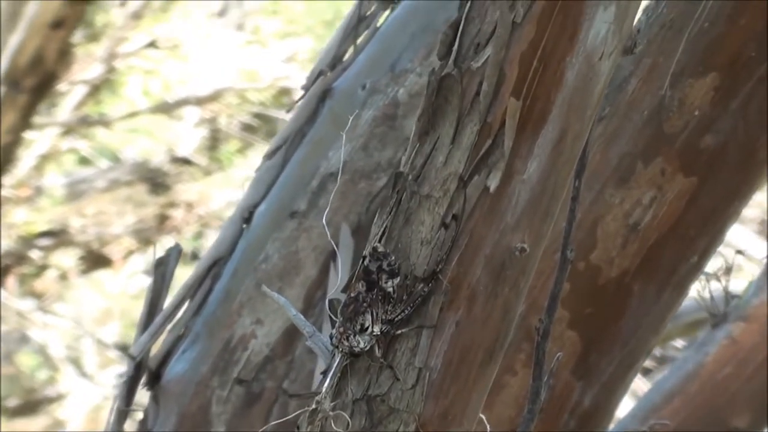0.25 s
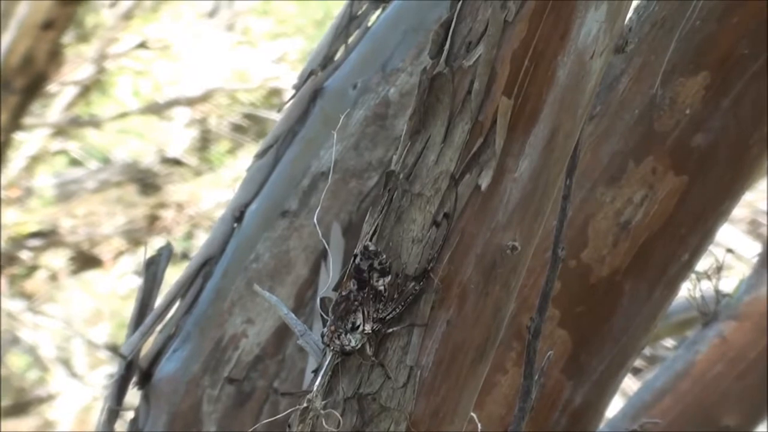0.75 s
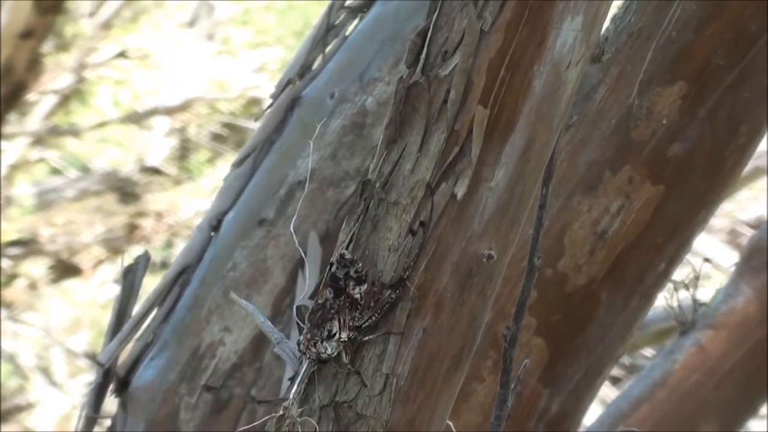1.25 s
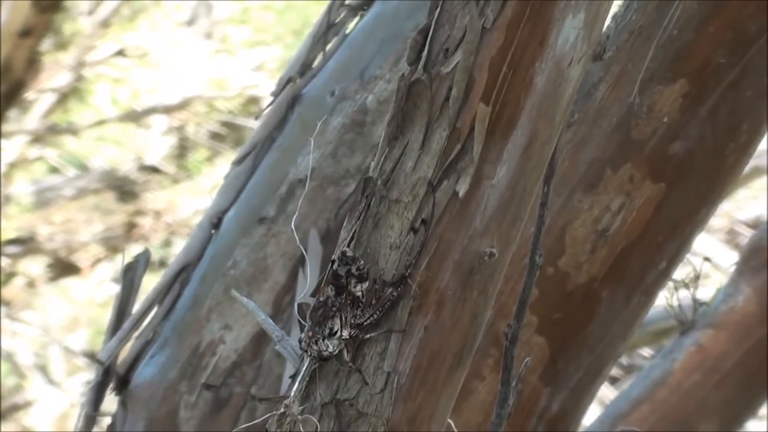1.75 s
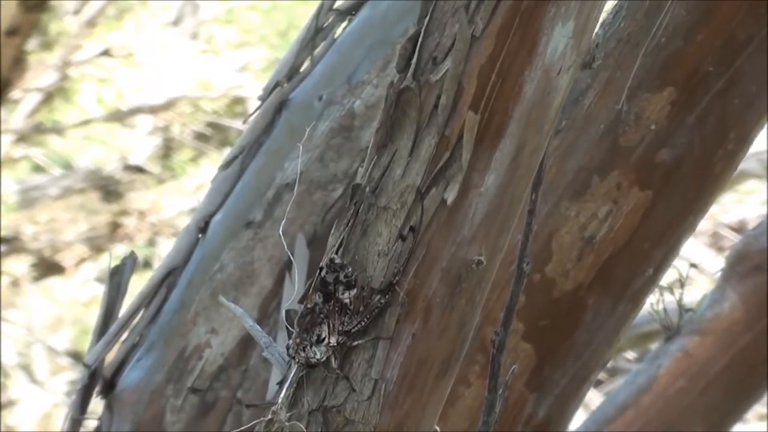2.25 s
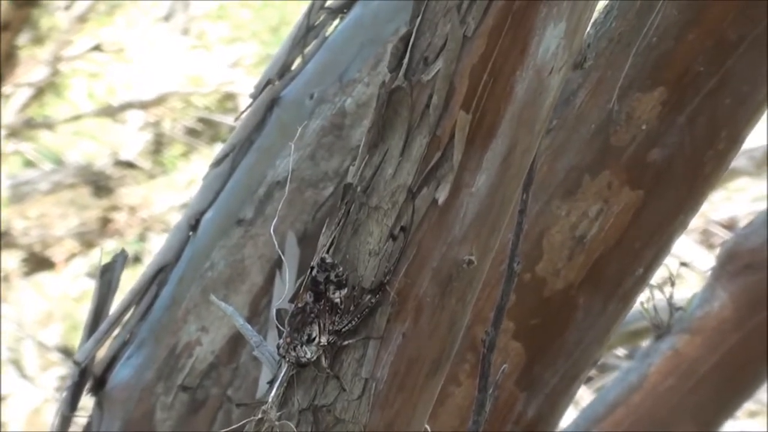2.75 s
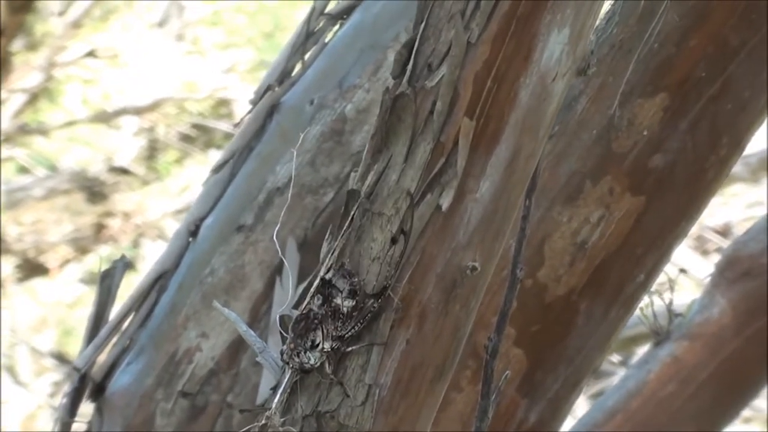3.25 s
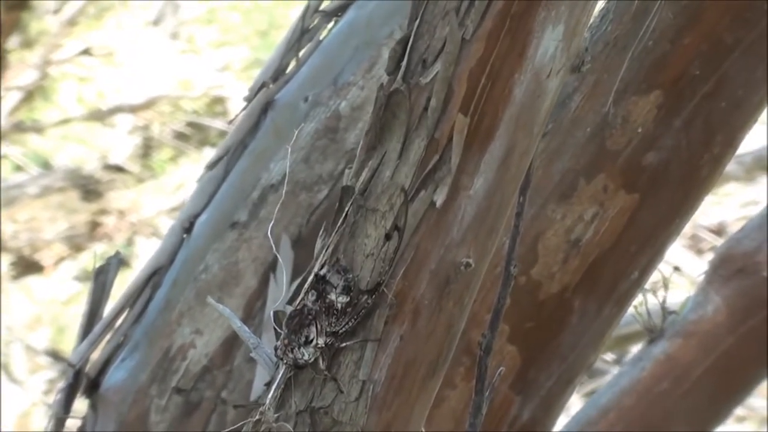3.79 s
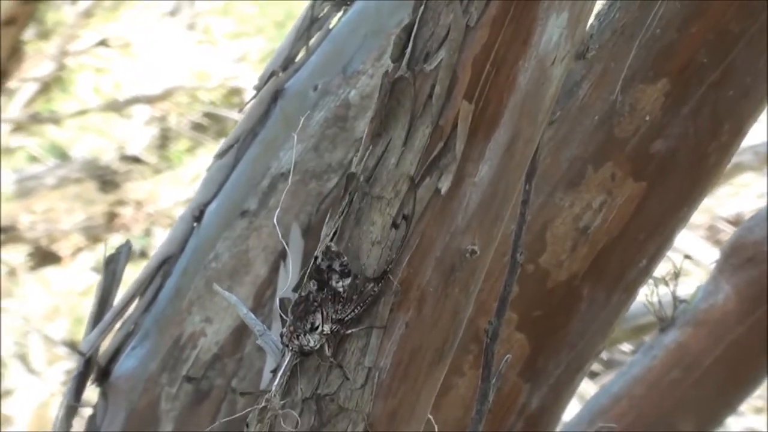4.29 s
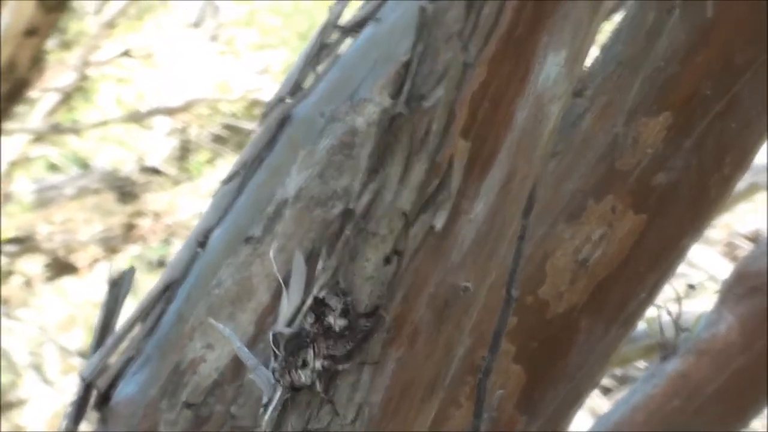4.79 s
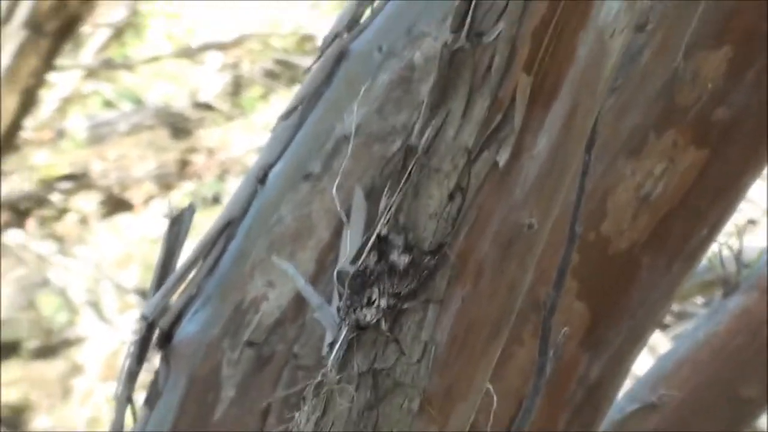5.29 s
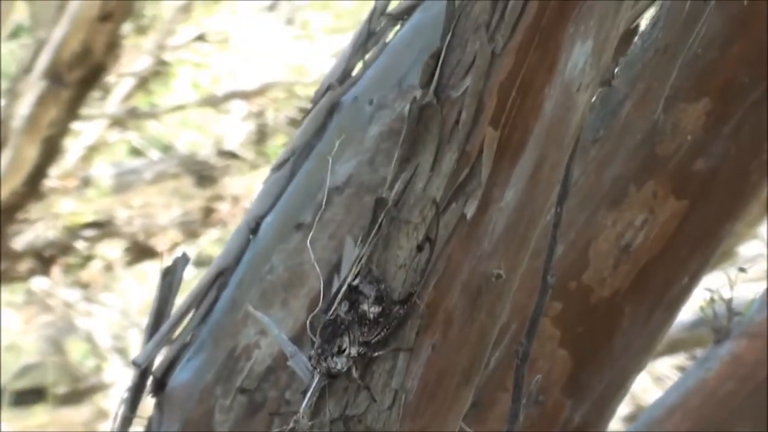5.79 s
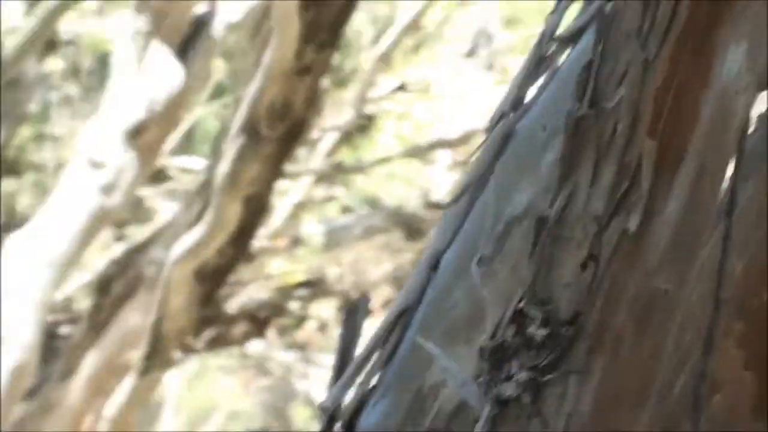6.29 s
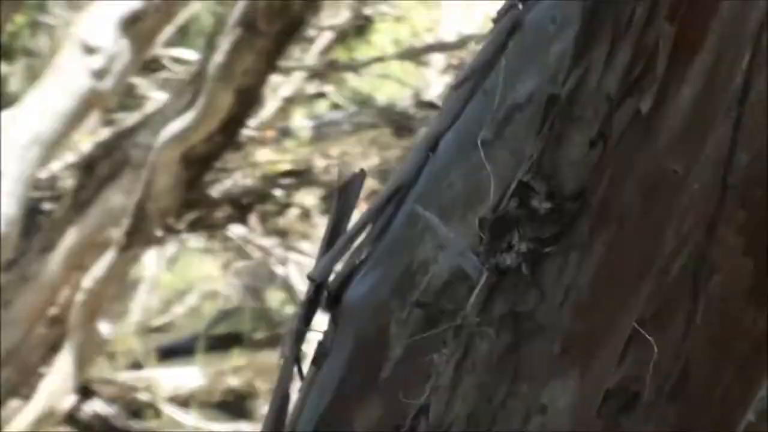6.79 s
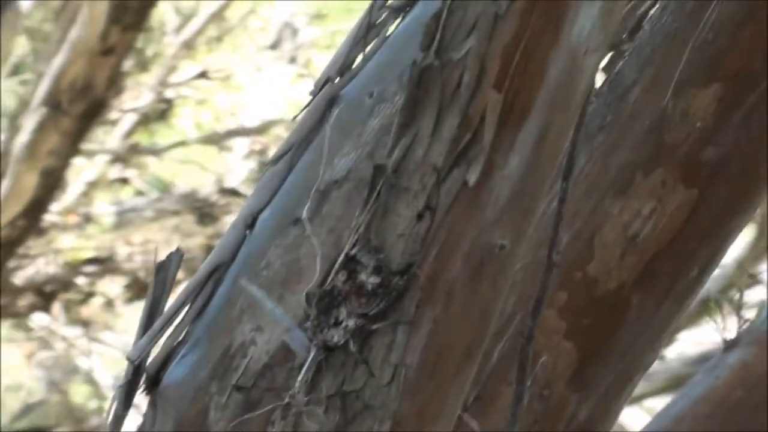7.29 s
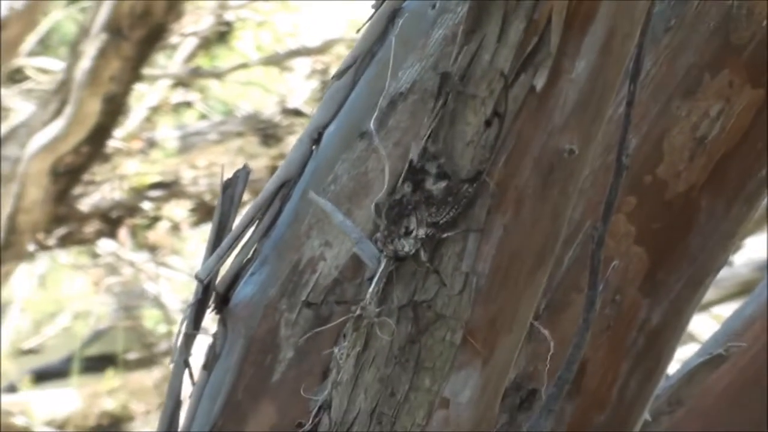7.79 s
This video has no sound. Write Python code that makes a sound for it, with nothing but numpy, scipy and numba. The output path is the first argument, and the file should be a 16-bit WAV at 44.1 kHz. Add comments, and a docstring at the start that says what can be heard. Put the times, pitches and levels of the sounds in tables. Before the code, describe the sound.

A close cicada chirps in a rapid dry rattle, pauses, then sings short phrases swelling into buzzes that stutter out, over distant cicadas and soft birds.

```python
"""On a tree trunk in woodland, a cicada sings close by: a long run of chirps, then short phrases that
mostly swell into a buzz and stutter out. Each muscle pull buckles a row of tymbal ribs, whose clicks fall
in pitch and ring the hollow abdomen. Behind it two other cicadas click the same way through echoes, birds
whistle gliding sine tones, and dry leaves rustle and scrape as filtered noise. A gain control holds the
song level and pushes the background down under it."""
import sys
import numpy as np
from scipy import signal
from scipy.fft import rfft, irfft
from scipy.io import wavfile
from scipy.ndimage import uniform_filter1d, minimum_filter1d
from numba import njit

SR = 44100
rng = np.random.default_rng(int(sys.argv[2]) if len(sys.argv) > 2 else 0)


def file_out(sig):
    """Save sig as 16-bit WAV at sys.argv[1]."""
    # one column per channel
    cols = np.atleast_2d(sig).T
    # limit, then scale
    lim = np.clip(cols, -1, 1)
    pcm = np.round(lim * 32767).astype(np.int16)
    wavfile.write(sys.argv[1], SR, pcm)


N = 355005
T = np.arange(N) / SR

STROKE_HZ = 161  # muscle pulls per second within a chirp
ARCH_TOP, ARCH_BEND = 0.704, 0.196  # where an arch of pitch peaks (share of its length), how strongly it bends


def undb(db):
    """Amplitude ratio: 20 dB is a factor of ten."""
    return 10 ** (np.asarray(db) / 20)


def curve(rows, at=T):
    """Linear interpolation through (time_s, value) rows."""
    return np.interp(at, *np.transpose(rows))


def unit(x):
    """Normalisation to an rms of 1."""
    return x / np.sqrt(np.mean(x ** 2))


def pan(x, db):
    """Interaural level difference: the left side is db louder than the right."""
    return x * undb(np.array([[db], [-db]]) / 2)


def colour(x, points, size=2048):
    """Minimum-phase filtering: a (pitch_hz, level_db) response made causal by folding its cepstrum."""
    hz, db = np.transpose(points)
    bins_hz = np.arange(size // 2 + 1) * SR / size
    response_db = np.interp(np.log(bins_hz + 1), np.log(hz), db)
    cepstrum = irfft(np.log(undb(response_db)))
    cepstrum[1:size // 2] *= 2
    cepstrum[size // 2 + 1:] = 0
    impulse = irfft(np.exp(rfft(cepstrum)))
    return signal.fftconvolve(x, impulse)[:len(x)]


def resonate(x, hz, width_hz):
    """Resonance of a single mode: a two-pole peak whose Q is centre over bandwidth."""
    return signal.lfilter(*signal.iirpeak(hz, hz / width_hz, fs=SR), x)


def trees(x, t60_s, apart, count=9000):
    """Diffuse scattering: bark, branches and ground return exponentially decaying noise-like echoes."""
    age = np.arange(count) / SR
    decay = undb(-60 * age / t60_s) * (age > .001)
    mid, side = rng.standard_normal((2, count)) * decay
    echoes = mid + apart * side * np.array([[1], [-1]])
    echoes = echoes / np.sqrt(np.sum(echoes[0] ** 2))
    return signal.fftconvolve(x[None], echoes, axes=1)[:, :N]


def progress(length_s):
    """Normalised time: a ramp from 0 to 1 over one note."""
    return np.linspace(0, 1, int(length_s * SR))


def arch(u):
    """Parabolic pitch contour: a ratio that climbs to 1 and sags a little."""
    return 1 - ARCH_BEND * (u - ARCH_TOP) ** 2


def breeze(flicker_db=1.7):
    """Broadband turbulence noise: a soft rustle that flickers as the leaves move."""
    # spectrum of moving air and leaves: pitch_hz, level_db (relative, per Hz)
    air = [(15, -64), (25, -30), (114, -17.5), (189, -3), (298, -1), (421, -4.5), (741, -0.5), (1330, -2.5),
           (2290, -5), (2610, -5), (3180, -8.5), (3700, -6.5), (4500, -8), (5850, -19), (9900, -120)]
    # stir of air and leaves: time_s, level_db
    stir = [(0, -46.5), (3.2, -50.5), (3.9, -50), (4.4, -50), (4.8, -48.5), (5.4, -47), (6.3, -47.2),
            (7.7, -48), (8.05, -43)]
    mid, side = (unit(colour(rng.standard_normal(N), air)) for _ in range(2))
    band = signal.butter(1, [220, 2500], "band", fs=SR, output="sos")
    side = .27 * signal.sosfilt(band, side)
    moments = np.arange(0, T[-1], 1 / 40)
    flicker = np.interp(T, moments, rng.standard_normal(len(moments)))
    rustle = pan(mid + side * np.array([[1], [-1]]), db=0.2)
    return rustle * undb(curve(stir) + flicker_db * flicker)


def scuffs():
    """Friction noise: brief dry scrapes and crackles, each a resonant band of noise."""
    # scrapes: start_s, length_s, centre_hz, width_hz, level_db (before the swell)
    scrapes = [(4.775, 0.017, 1150, 700, -42), (5.009, 0.022, 700, 1000, -43),
               (5.758, 0.01, 3620, 4070, -33), (5.768, 0.039, 2200, 3500, -42),
               (6.036, 0.027, 418, 298, -42.5), (6.65, 0.018, 497, 400, -42),
               (6.688, 0.041, 740, 487, -45.5), (6.898, 0.011, 620, 400, -37.5)]
    out = np.zeros(N + SR)
    for s, length, hz, width_hz, db in scrapes:
        u = progress(length)
        noise = unit(resonate(rng.standard_normal(len(u)), hz, width_hz))
        swell = np.sin(np.pi * np.sqrt(u))
        out[int(s * SR):][:len(u)] += undb(db) * swell * noise
    return out[:N]


def falling_calls():
    """Frequency glide: one bird's calls fall quickly and settle on their last pitch."""
    # calls: start_s, length_s, first_hz, last_hz, level_db
    slurs = [(.001, 0.03, 3100, 2600, -30.5), (0.104, 0.044, 4600, 3270, -31.5),
             (0.378, 0.034, 4700, 3090, -33), (0.637, 0.061, 3130, 2420, -37.5),
             (.785, 0.057, 3350, 2400, -39.5), (0.941, 0.069, 3400, 2250, -42),
             (1.095, 0.073, 3700, 2050, -43)]
    return [(s, last + (first - last) * (1 - progress(length)) ** 1.7, db)
            for s, length, first, last, db in slurs]


def arched_notes(length_s=0.064, top_hz=2560):
    """Parabolic glide: the same bird's soft notes in between."""
    # notes: start_s, level_db
    coos = [(.248, -44.5), (0.516, -41.5)]
    return [(s, top_hz * arch(progress(length_s)), db) for s, db in coos]


def trills(pip_s=0.019, every_s=0.022, top_hz=2697, fall_hz=130, swell_db=1.6,
           scatter_db=2.5, scatter_hz=35, count=4):
    """Pulse trains: a second bird's quick pips, each falling, climb together along an arch and swell."""
    # trills: start_s, level_db (of the last pip, before scatter)
    groups = [(4.627, -46), (4.857, -44.5), (5.064, -51), (5.296, -46), (7.208, -49), (7.461, -49),
              (7.684, -47), (7.936, -44)]
    notes = []
    for (s, db), chance in zip(groups, rng.standard_normal((len(groups), count, 2))):
        for k, (sharp, strong) in enumerate(chance):
            hz = top_hz * arch(k / (count - 1)) + fall_hz * (.5 - progress(pip_s)) + scatter_hz * sharp
            pip_db = db - swell_db * (count - 1 - k) + scatter_db * strong
            notes.append((s + k * every_s, hz, pip_db))
    return notes


def birds(wet_db=-8):
    """Phase integration: thin whistles are sines whose phase sums a gliding pitch."""
    out = np.zeros(N + SR)
    for s, hz, db in falling_calls() + arched_notes() + trills():
        swell = np.sin(np.pi * np.linspace(0, 1, len(hz)) ** 0.6)
        whistle = np.sin(2 * np.pi * np.cumsum(hz) / SR)
        out[max(0, int(s * SR)):][:len(hz)] += undb(db) * swell * whistle
    return out[:N] + undb(wet_db) * trees(out[:N], t60_s=0.31, apart=0.057)


def strokes(chirps):
    """Periodic muscle drive: rows (start_s, time_left_s) of the pulls that fill each chirp."""
    rows = []
    for s, length in chirps:
        into = np.arange(max(1, round(length * STROKE_HZ))) / STROKE_HZ
        if len(into) > 10:  # a long buzz tires: its last pulls come later and later
            into = into[:-1] + (into[:-1] / into[-2]) ** 6 / STROKE_HZ
        rows.append(np.column_stack([s + into, length - into]))
    return np.concatenate(rows)


def tymbal(starts, reach, slow, uneven, scatter_db, jitter_s, size=96):
    """Sequential buckling: ribs snap one by one as far as a pull reaches; a slow pull spreads them out."""
    # ribs in the order they buckle: pitch_hz, level_db, decay_s
    ribs = [(8700, -1, .0001), (8450, 0, .00013), (8300, -.5, .00015), (8200, 0, .00016), (8050, 0, .00017),
            (7950, -.5, .00018), (7750, -1.5, .0002), (7400, -3, .00023), (7000, -6, .00026)]
    # the wait from rib to rib, for a pull of full vigour: gap_s
    rib_gaps = [.00118, .00087, .00085, .00082, .00079, .00078, .00078, .00075]
    # the note of the tymbal plate drops as it caves in: time_s (into the pull), pitch_hz
    plate_sweep = [(0, 9700), (.0015, 9350), (.003, 8900), (.005, 8200), (.0075, 6900), (.012, 6500)]
    hz, db, decay = np.transpose(ribs)
    chance = rng.standard_normal((len(starts), 3 + 2 * len(ribs)))
    timing, force = np.hsplit(chance[:, 3:], 2)
    pace = slow[:, None] * (1 + uneven * chance[:, 1:2])
    offset = np.cumsum([0, *rib_gaps]) * pace + .000065 * timing
    when = starts[:, None] + jitter_s * chance[:, :1] + offset
    # the ribs snap in step with the plate, so its falling note runs on through the clicks
    into = np.arange(SR // 80) / SR
    plate_turns = np.cumsum(curve(plate_sweep, into)) / SR
    turns = np.interp(offset, into, plate_turns) * (1 + .03 * chance[:, 2:3])
    turns = turns + .09 * rng.standard_normal(offset.shape)
    index = np.ceil(when * SR).astype(int)[..., None] + np.arange(size)
    age = index / SR - when[..., None]
    # every click swells and dies within a few cycles
    envelope = age / decay[:, None] * np.exp(-age / decay[:, None])
    rings = envelope * np.sin(2 * np.pi * (hz[:, None] * age + turns[..., None]))
    strength = (offset < reach[:, None]) * undb(db + scatter_db * force)
    clicks = (strength[..., None] * rings).ravel()
    return np.bincount(np.clip(index, 0, N).ravel(), clicks, N + 1)[:N]


def far_cicada(pulls, wet_db, pan_db):
    """Multipath propagation: the same song from another tree, blurred by echoes."""
    # colour of a song heard through the trees: pitch_hz, level_db
    far_colour = [(2500, -32), (5000, -6), (5600, -1.5), (6100, 0.5), (6800, 6), (8000, -0.5), (8850, 3),
                  (9400, 1.5), (10100, 4), (11000, -3), (13000, -4.5), (15500, -5)]
    starts, left = pulls.T
    clicks = tymbal(starts, left, np.ones(len(starts)), uneven=0.0705, scatter_db=2.5, jitter_s=0.000294)
    song = colour(clicks, far_colour)
    return unit(pan(song, pan_db) + undb(wet_db) * trees(song, t60_s=0.067, apart=0.37))


def chirping_neighbour(chirp_hz=26.95):
    """Periodic bursts: a neighbour chirps evenly while its level drifts."""
    # its loudness: time_s, level_db
    loudness = [(0, -26), (3.1, -29.5), (3.9, -28), (4.5, -24.5), (5.35, -25), (5.7, -36), (5.9, -24),
                (6.3, -35.5), (6.7, -36.5), (8.05, -34)]
    onsets = np.arange(0, T[-1], 1 / chirp_hz)
    chirps = zip(onsets, rng.uniform(0.029, .031, len(onsets)))
    return far_cicada(strokes(chirps), wet_db=-1.5, pan_db=4.5) * undb(curve(loudness))


def buzzing_neighbour(pull_hz=139.4, lull_db=-40, waver=.04):
    """Unbroken pulse train: another buzzes at a wavering rate, swelling and sinking back."""
    # swells: peak_s, width_s (time to rise or fall), level_db
    swell_rows = [(1.6, 1.84, -18), (3.36, 0.1, -22), (4.02, 0.27, -24), (4.701, 0.9, -31.5),
                  (5.5, 0.42, -30), (6.43, 0.053, -36.5), (6.9, 0.31, -29), (7.32, 0.12, -32),
                  (7.8, .2, -18)]
    starts = np.arange(0, T[-1], 1 / pull_hz)
    starts = starts + waver * np.cumsum(rng.standard_normal(len(starts))) / pull_hz
    pulls = np.column_stack([starts, np.full(len(starts), .005)])
    swells = [undb(db) * np.exp(-((T - s) / width) ** 2) for s, width, db in swell_rows]
    swelling = np.sqrt(undb(lull_db) ** 2 + np.sum(np.square(swells), axis=0))
    return far_cicada(pulls, wet_db=0.5, pan_db=0.5) * swelling


def run_chirps(long_pulls=5, short_pulls=4, overrun_s=.0008):
    """Burst grouping: rows (start_s, length_s) of the opening run, each surge starting with long chirps."""
    # surges: start_s, chirp_rate_hz, long_chirps, short_chirps
    surges = [(.0155, 26.4, 8, 5), (.5094, 26.35, 5, 5), (.8892, 26.2, 5, 9), (1.4236, 26.1, 7, 3),
              (1.8062, 26.1, 3, 2), (1.9976, 26.2, 4, 7), (2.4176, 26.3, 3, 8), (2.8336, 25.65, 2, 4)]
    rows = []
    for s, rate, long, short in surges:
        pulls = [long_pulls] * round(long) + [short_pulls] * round(short)
        # the last pull of a chirp runs over
        rows += [(s + k / rate, n / STROKE_HZ + overrun_s) for k, n in enumerate(pulls)]
    return rows


def phrase(s, spacing, slowing, chirps, first, growth, most, buzz_s, stutters, fade_pulls=2,
           cut_short_s=0.00089, stutter_wait_s=0.002, stutter_every_s=0.011, stutter_s=.0056):
    """Burst growth: rows (start_s, length_s) of growing chirps, then a buzz and stutters or a quick fade."""
    k = np.arange(round(chirps) + 1)
    *starts, buzz_start = s + spacing * k + slowing * k ** 2 / 2
    pulls = np.minimum(first + growth * k[:-1], most)
    if buzz_s > 0:
        after = buzz_start + buzz_s + stutter_wait_s
        ending = [(buzz_start, buzz_s)]
        ending += [(after + i * stutter_every_s, stutter_s) for i in range(round(stutters))]
    else:  # chirps lose pulls towards the end
        pulls, ending = np.minimum(pulls, 1 + fade_pulls * k[-2::-1]), []
    # the last pull of a chirp is cut short
    return list(zip(starts, np.round(pulls) / STROKE_HZ - cut_short_s)) + ending


def score(undertone_wait_s=0.027):
    """Song structure: chirps and undertones (start_s, length_s), effort (time_s, level_db) rising by phrase."""
    # how hard it sings through the opening run: time_s, level_db
    run_effort = [(0, -1), (3.05, -3.5)]
    # later phrases: start_s, chirp_spacing_s, spacing_added_per_chirp_s, chirps, pulls_in_first,
    # pulls_added_per_chirp, most_pulls, buzz_s, stutters, first_level_db, last_level_db
    phrases = [(4.0494, .0320, .0009, 11, 1.7, .65, 4, 0, 0, -9.5, -5.5),
               (5.0126, .0363, -.0004, 6, 1, 2, 3, .086, 2, -11, -3),
               (5.9562, .0347, -.0006, 4, 1.7, .65, 4, .083, 2, -10.5, -5),
               (6.7005, .0333, .00028, 8, 1.45, .33, 4, .101, 2, -12.5, -3.5),
               (7.5625, .0333, .00017, 7, 1.4, .4, 3, .081, 3, -15, -1)]
    chirps, undertones, effort = run_chirps(), [], list(run_effort)
    for *shape, first_db, last_db in phrases:
        rows = phrase(*shape)
        start, end = rows[0][0], sum(rows[-1])
        climax = max(rows, key=lambda row: row[::-1])[0]  # start of the longest chirp or buzz
        chirps += rows
        # a soft buzz sets in after the phrase starts and runs on between its chirps
        undertones.append((start + undertone_wait_s, climax - start - undertone_wait_s))
        effort += [(start, first_db), (end, last_db)]
    return chirps, undertones, effort


def sing(chirps, effort):
    """Force-dependent buckling: weak pulls of the near cicada are slow and stop after a few ribs."""
    starts, left = strokes(chirps).T
    vigour = np.interp(curve(effort, starts), [-12, -5], [0, 1])
    reach = np.minimum(left, 0.0053 + 0.004 * vigour)
    return tymbal(starts, reach, 1.4 - .4 * vigour, uneven=.045, scatter_db=.8, jitter_s=.00018)


def near_cicada(body_db=-46, undertone_db=-13, bark_db=-17, wood_db=-25):
    """Source and resonator: rib clicks ring the abdomen, which also hums faintly at the rate of the clicks."""
    # response of the abdomen: pitch_hz, level_db
    abdomen = [(2500, -29), (4200, -19), (4900, -12.5), (5300, -8), (5650, -5.5), (6000, -1.5), (6600, 4),
               (7300, 3), (8000, 1), (8700, 2.5), (9400, 1.5), (10200, -2.5), (11000, -8.5), (12600, -7),
               (13600, -11), (15500, -5.5)]
    chirps, undertones, effort = score()
    clicks = sing(chirps, effort) + undb(undertone_db) * sing(undertones, effort)
    hum = resonate(resonate(np.abs(clicks), 1290, 430), 1560, 710)
    # the share of time filled by chirps sets the overall rms
    sounding = np.sqrt(np.sum(chirps, axis=0)[1] / T[-1])
    voice = unit(colour(clicks, abdomen)) + undb(body_db) * unit(hum)
    song = voice * sounding * undb(curve(effort))
    bark = undb(bark_db) * trees(song, t60_s=0.07, apart=0.75)
    wood = undb(wood_db) * trees(song, t60_s=0.4, apart=0.18)
    return pan(song + bark + wood, db=-.6)


def scene():
    """Superposition: the woodland background and the near cicada add linearly."""
    return breeze() + scuffs() + birds() + chirping_neighbour() + buzzing_neighbour() + near_cicada()


@njit
def follow(x, attack, release):
    """Envelope detection: one-pole smoothing that rises fast and sinks slowly."""
    out, e = np.empty(len(x)), x[:2000].max()
    for i in range(len(x)):
        e += (x[i] - e) * (attack if x[i] > e else release)
        out[i] = e
    return out


def record(dry, ceiling_db=-1.0, attack_s=0.00016, release_s=0.36, rumble_db=-74, top_hz=15900, size=24):
    """Look-ahead limiting: gain falls to hold a ceiling; a faint rumble is added and the top cut off."""
    # spectrum of the low rumble: pitch_hz, level_db (relative, per Hz)
    rumble_colour = [(15, -15), (30, -13), (60, -4), (110, -2), (170, 1), (300, -25), (1000, -42)]
    peak = np.abs(dry).max(axis=0)
    envelope = follow(peak, 1 / (1 + attack_s * SR), 1 / (1 + release_s * SR))
    gain = np.minimum(1, undb(ceiling_db) / envelope)
    # lone peaks are caught at once
    gain = np.minimum(gain, .88 / (peak + 1e-9))
    # the lowest gain nearby, smoothed, so that it drops just before a peak
    held = dry * uniform_filter1d(minimum_filter1d(gain, 2 * size), size)
    rumble = undb(rumble_db) * unit(colour(rng.standard_normal(N), rumble_colour))
    low_pass = signal.ellip(10, .1, 80, top_hz, fs=SR, output="sos")
    return signal.sosfilt(low_pass, held + rumble)


dry = scene()
out = record(dry)
file_out(out)
```